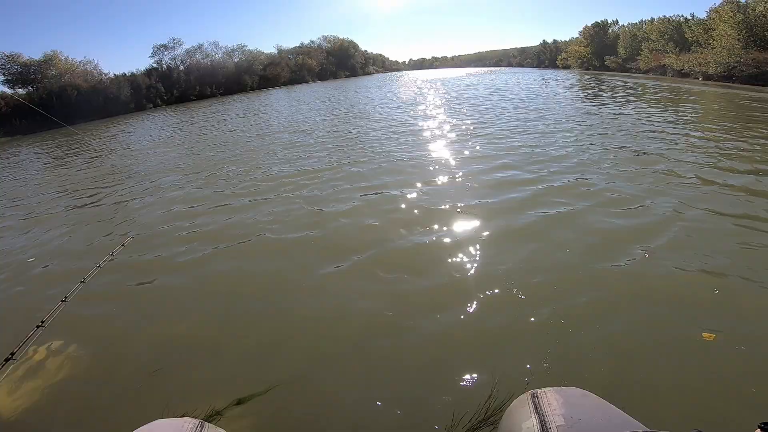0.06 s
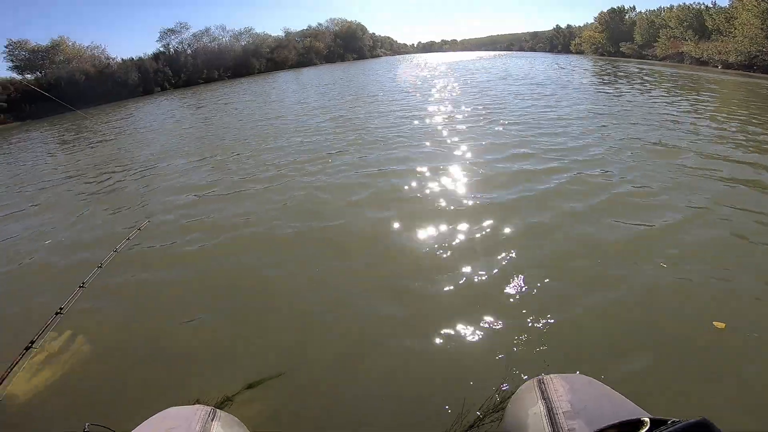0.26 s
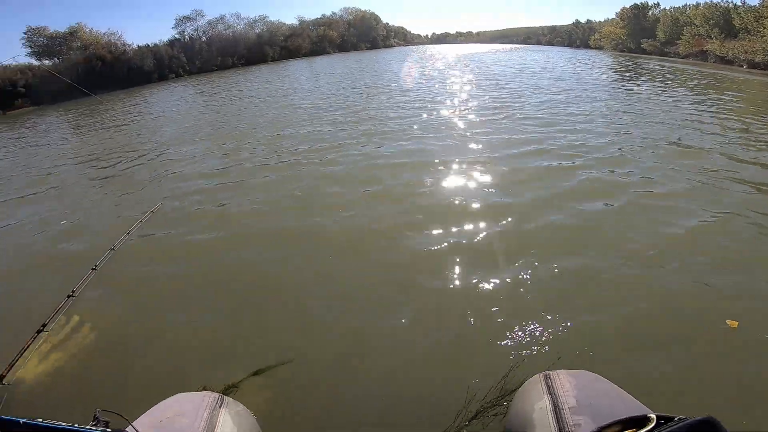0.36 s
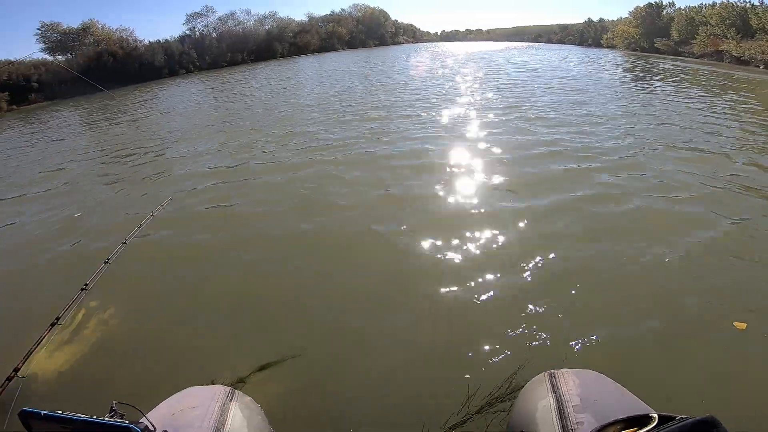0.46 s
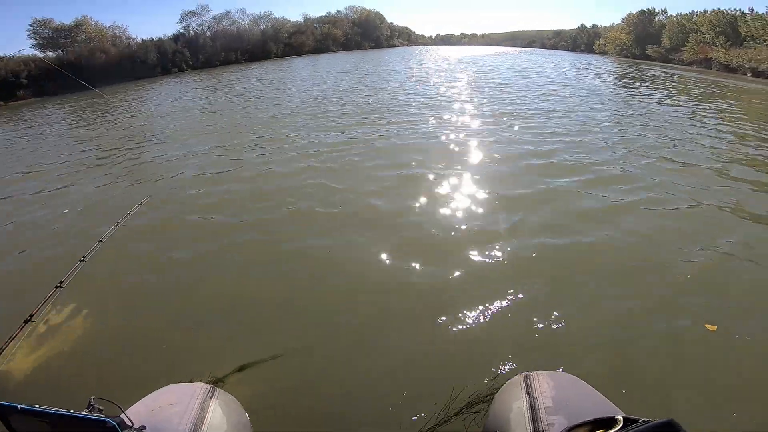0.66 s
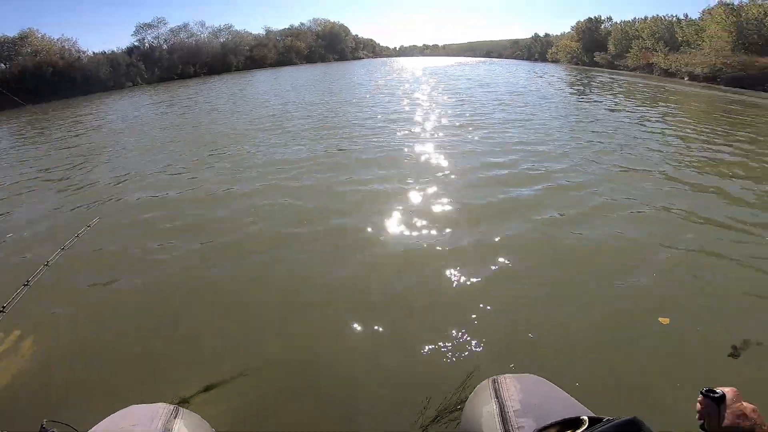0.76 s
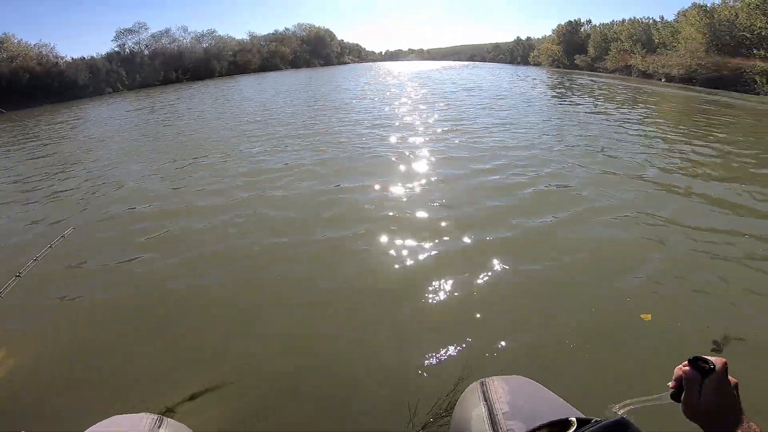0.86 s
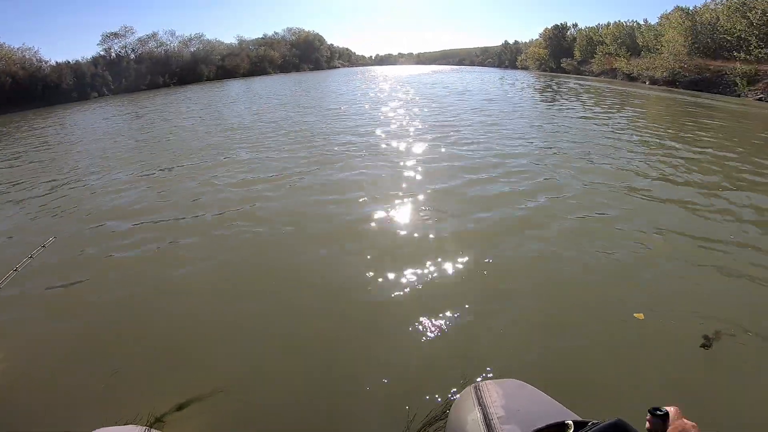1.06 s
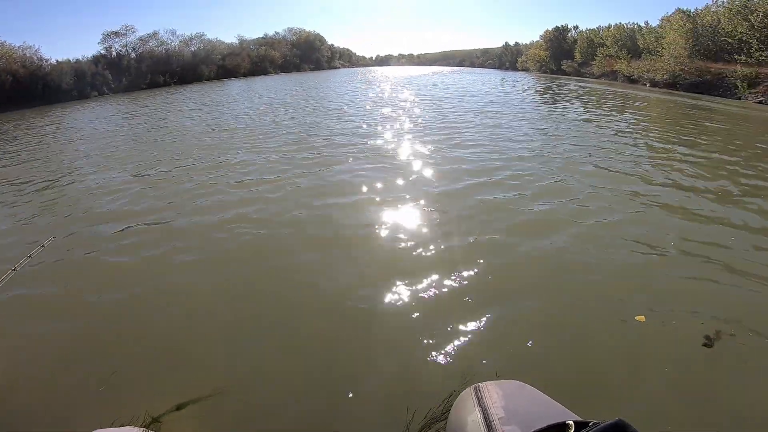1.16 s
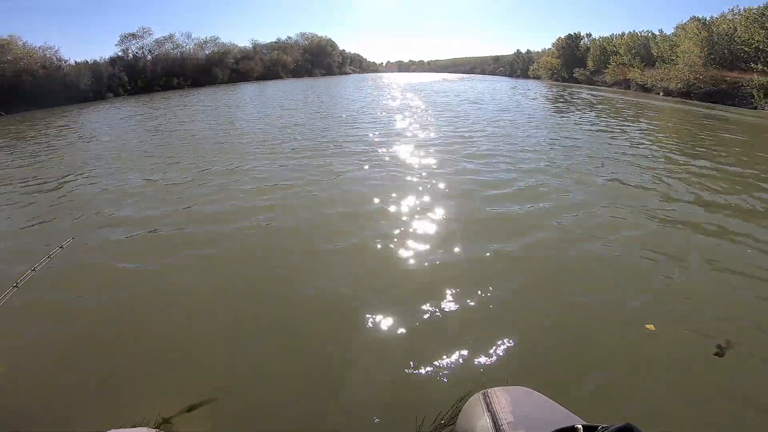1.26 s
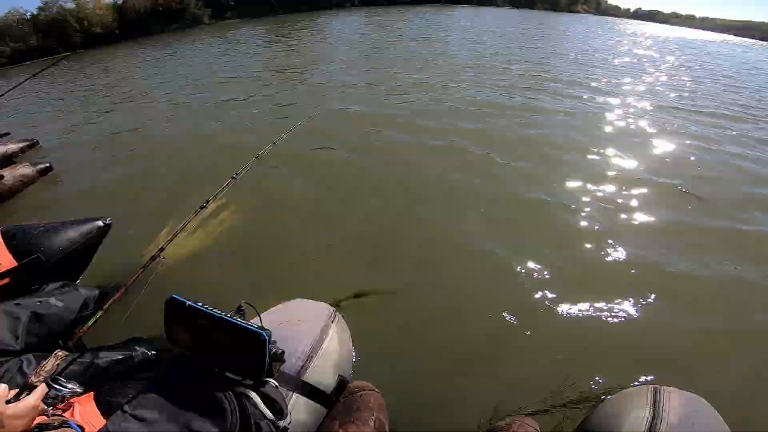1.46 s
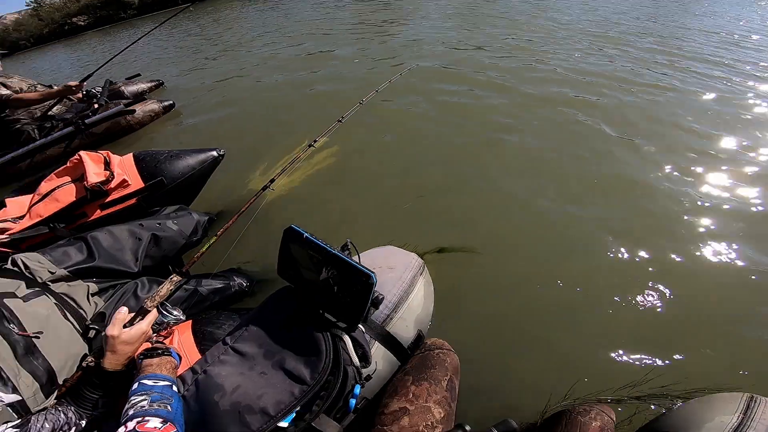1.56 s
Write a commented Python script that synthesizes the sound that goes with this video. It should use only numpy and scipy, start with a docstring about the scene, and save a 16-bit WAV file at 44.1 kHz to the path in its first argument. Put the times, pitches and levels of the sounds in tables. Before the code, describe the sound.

A heavy lure hits a calm river at about 0.2 seconds with a low plop that quickly rises in pitch. Light spray, small bubbles and ticking droplets follow until about 0.7 seconds. A second low plop comes at 1.2 seconds, again trailed by spray and bubbles. Ripples softly glug and lap against a small float over a faint rumble and wash, all close and without echo.

```python
"""Two low plops of a heavy lure in a calm river, heard from a small float.
Each time the surface is slapped, a cavity opens and throbs, then pinches off as a big bubble
whose pitch sweeps up; spray falls back. Small bubbles ring and droplets tick, and ripples
lap at the float over a soft rumble, wash and hiss."""
import sys
import numpy as np
from scipy import signal
from scipy.fft import rfft, irfft
from scipy.io import wavfile

SR = 44100
rng = np.random.default_rng(int(sys.argv[2]) if len(sys.argv) > 2 else 0)


def to_wav(s):
    """Save 16-bit WAV."""
    ch = np.atleast_2d(s).T  # columns
    pcm = np.round(np.clip(ch, -1, 1) * 32767)  # PCM
    wavfile.write(sys.argv[1], SR, pcm.astype(np.int16))


N = 70560
TIME = np.arange(N) / SR


def from_db(db):
    """Decibels to gain."""
    return 10 ** (np.asarray(db) / 20)


def level_curve(points):
    """Gain through (time_s, level_db) points."""
    return from_db(np.interp(TIME, *np.transpose(points)))


def age(start_s):
    """Seconds since an event began, zero before it."""
    return np.maximum(TIME - start_s, 0)


def envelope(start_s, attack_s, t60_s, hold_s=0):
    """Linear rise, hold, exponential release."""
    rise = np.minimum(age(start_s) / attack_s, 1)
    return rise * from_db(-60 * age(start_s + attack_s + hold_s) / t60_s)


def coloured(source, spectrum):
    """Filter by (freq_hz, gain_db) points, falling 12 dB per octave beyond the ends; rms 1."""
    freq_hz, gain_db = np.transpose(spectrum)
    bin_hz = np.maximum(np.arange(N // 2 + 1) * SR / N, 1)
    skirts = np.minimum(bin_hz / freq_hz[0], 1) ** 2 * np.minimum(freq_hz[-1] / bin_hz, 1) ** 2
    gain = from_db(np.interp(np.log(bin_hz), np.log(freq_hz), gain_db))
    out = irfft(rfft(source) * skirts * gain, N)
    return out / out.std()


def noise(spectrum):
    """Coloured Gaussian noise; rms 1."""
    return coloured(rng.standard_normal(N), spectrum)


def patter(spectrum, per_s, spread_db=5.5):
    """Tiny random impacts of uneven size; rms 1."""
    sizes = from_db(spread_db * np.minimum(rng.exponential(1, N), 4)) * rng.choice([-1, 1], N)
    hits = rng.random(N) < per_s / SR
    return coloured(sizes * hits, spectrum)


def tone(start_s, pitch_hz):
    """A pocket of air pulsating at a steady or moving pitch."""
    return np.sin(2 * np.pi * np.cumsum(pitch_hz * (TIME >= start_s)) / SR)


def wobble(depth_db, rate_hz=110.7):
    """Random flutter of a bubble's loudness as its shape changes."""
    return from_db(depth_db * noise([(rate_hz / 2, 0), (rate_hz, 0)]))


# Rumble and gurgle levels: time_s, level_db
RUMBLE_CURVE = [(0, -44.5), (.3, -45), (.55, -47.5), (.68, -56.5), (.85, -47), (1.03, -52.5), (1.17, -39),
                (1.35, -41), (1.5, -41), (1.6, -44)]
GURGLE_CURVE = [(0, -88), (.12, -63.5), (.36, -47), (.52, -58.5), (.65, -66.5), (.85, -71.5), (1.03, -62.5),
                (1.2, -64.5), (1.29, -52.5), (1.45, -70), (1.6, -62)]
# Their spectra: freq_hz, gain_db
RUMBLE_SPECTRUM = [(18, 3), (33, 0), (65, 1), (110, -8), (180, -8.5), (280, -26.5), (400, -35.5),
                   (600, -48)]
GURGLE_SPECTRUM = [(150, 4), (230, 3.5), (320, 5), (400, -11), (520, -22.5)]


def rumble_and_gurgle():
    """Water and air rumble round the float; water gurgles under it."""
    rumble = level_curve(RUMBLE_CURVE) * noise(RUMBLE_SPECTRUM)
    gurgle = level_curve(GURGLE_CURVE) * noise(GURGLE_SPECTRUM)
    return rumble + gurgle


# Hiss level: time_s, level_db
HISS_CURVE = [(0, -77), (.19, -68.5), (.35, -75), (.6, -77.5), (.8, -78), (1.08, -77), (1.14, -70.5),
              (1.19, -62), (1.3, -76.5), (1.42, -73.5), (1.54, -68.5), (1.6, -74)]
# Hiss spectrum: freq_hz, gain_db
HISS_SPECTRUM = [(2500, -5.5), (3600, -10.5), (4600, 4.5), (5200, 1), (6400, -9), (7300, -18), (9000, -17),
                 (11000, -29), (12500, -20), (15500, -23)]


def hiss():
    """Water hisses faintly."""
    return level_curve(HISS_CURVE) * noise(HISS_SPECTRUM)


def trickle(per_s=150, low_hz=560, high_hz=2140, cycles=12, chirp=0.12):
    """A crowd of tiny bubbles, each ringing briefly and rising a little; rms 1."""
    out = np.zeros(N)
    for when, pitch, softness in rng.random((int(per_s * N / SR), 3)):
        onset = int(when * N)
        pitch_hz = low_hz * (high_hz / low_hz) ** pitch
        samples = min(int(cycles / pitch_hz * SR), N - onset)
        life = np.arange(samples) * pitch_hz / (SR * cycles)  # 0 to 1
        ring = np.sin(2 * np.pi * cycles * life * (1 + chirp * life))
        out[onset:onset + samples] += ring * np.sqrt(life) * from_db(-20 * softness - 60 * life)
    return out / out.std()


# Wash level before trim: time_s, level_db
WASH_CURVE = [(0, -78), (.11, -76), (.19, -63.5), (.37, -68), (.45, -69.5), (.6, -71), (.8, -78.5),
              (1.1, -76), (1.18, -65.5), (1.3, -69), (1.42, -63.5), (1.52, -64), (1.6, -65)]
# Wash spectrum: freq_hz, gain_db
WASH_SPECTRUM = [(300, 0), (550, 0.5), (900, 3.5), (1800, 1.5), (2600, -8.5), (3500, -19.5), (6000, -26),
                 (8000, -33)]


def wash(trim_db=-4):
    """Water washes past: equal parts smooth noise and tiny bubbles."""
    return from_db(trim_db) * level_curve(WASH_CURVE) * (noise(WASH_SPECTRUM) + trickle())


# Glugs under the float: start_s, pitch_hz, level_db, attack_s, t60_s
RIPPLE_GLUGS = [(0.071, 125, -34, 0.018, 0.02), (0.336, 248.4, -46, 0.016, 0.12),
                (0.359, 313, -41, 0.0055, 0.077), (0.9638, 266, -38, 0.0042, 0.059),
                (0.964, 149.8, -40, 0.0028, 0.18), (1.105, 176.6, -31, 0.025, 0.026),
                (1.35, 125.7, -30.5, 0.0087, 0.079), (1.494, 34.4, -26.5, 0.014, 0.16),
                (1.59, 189, -34.5, 0.0033, 0.066)]
# Laps on its side: start_s, level_db
RIPPLE_LAPS = [(0.9637, -50), (1.328, -48.5), (1.444, -55), (1.594, -62.5)]
# Lap spectrum: freq_hz, gain_db
LAP_SPECTRUM = [(150, 6.5), (300, -1.5), (700, 7), (1300, -13.5), (2200, -17), (4000, -52.5)]


def ripples(rise_hz_per_s=100):
    """Wavelets trap air under the float and splash on its side."""
    glugs = np.zeros(N)
    for start_s, pitch_hz, level_db, attack_s, t60_s in RIPPLE_GLUGS:
        ring = tone(start_s, pitch_hz + rise_hz_per_s * age(start_s))
        glugs += from_db(level_db) * ring * envelope(start_s, attack_s, t60_s)
    lap_gain = sum(from_db(level_db) * envelope(start_s, attack_s=0.0016, t60_s=0.06)
                   for start_s, level_db in RIPPLE_LAPS)
    return glugs + lap_gain * noise(LAP_SPECTRUM)


# Single drops: start_s, pitch_hz, ring_db, click_db
DROP_TICKS = [(0.0743, 5590, -53.5, -73), (0.457, 5900, -68, -68), (0.482, 4470, -55, -64),
              (.491, 4330, -53, -58.5), (.605, 5700, -65.5, -68), (0.662, 5530, -65, -68),
              (0.965, 4020, -59.5, -73), (1.061, 5560, -60, -71), (1.329, 5750, -63.5, -64.5)]
# Crackle of fine drops: time_s, level_db
CRACKLE_CURVE = [(0.1, -88.5), (.45, -76), (.66, -80.5), (.8, -91), (1.35, -82)]
# Click and crackle spectrum: freq_hz, gain_db
DROP_SPECTRUM = [(3200, -14.5), (4300, -5), (6400, -10), (7300, -23), (11000, -33), (12500, -15),
                 (15000, -29.5)]


def droplets(jitter_rms_hz=350, jitter_rate_hz=330):
    """Fine drops crackle as they fall back; single ones land with a click and a wavering ring."""
    click = noise(DROP_SPECTRUM)
    jitter_hz = jitter_rms_hz * noise([(jitter_rate_hz / 2, 0), (jitter_rate_hz, 0)])
    ticks = np.zeros(N)
    for start_s, pitch_hz, ring_db, click_db in DROP_TICKS:
        ring = from_db(ring_db) * tone(start_s, pitch_hz + jitter_hz)
        ticks += (ring + from_db(click_db) * click) * envelope(start_s, attack_s=0.0016, t60_s=0.017)
    return ticks + level_curve(CRACKLE_CURVE) * patter(DROP_SPECTRUM, per_s=1200)


# Small bubbles: start_s, pitch_hz, rise_hz_per_s, level_db, attack_s, t60_s
SMALL_BUBBLES = [(0.199, 366, 3003.5, -17.5, 0.0049, .018), (0.199, 1595, 5010, -35, 0.0025, 0.018),
                 (0.211, 1068, 3000, -33.5, 0.0014, 0.027), (0.238, 860, 25003, -42.5, 0.003, 0.02),
                 (.268, 1070, -2, -52, .003, 0.037), (0.354, 1290, 9000, -62, 0.009, 0.053),
                 (.481, 670, 33996, -52.5, 0.0041, 0.089), (0.499, 1766, 12091.5, -43.5, 0.0034, 0.0076),
                 (0.507, 1434, 500, -62.5, .004, 0.079), (0.574, 1182, 24586, -65, .012, .05),
                 (0.602, 1093, 17003.5, -60.5, 0.0067, 0.077), (.631, 526.5, 16503.5, -58.5, 0.015, 0.13),
                 (0.693, 1065, 2995.5, -66, .004, 0.057), (1.217, 1214, 4998.5, -35.5, 0.0021, 0.018),
                 (1.2226, 1044, 5000.5, -33.5, .002, 0.0091), (1.2245, 2136, 5000, -40.5, 0.0025, 0.02),
                 (1.259, 1255, 9004.5, -44.5, 0.002, 0.023), (1.33, 843, 5035, -52.5, 0.003, 0.074),
                 (1.33, 1234, 5003, -44.5, 0.00066, 0.022), (1.354, 1143, 5006, -50.5, 0.00353, 0.0185),
                 (1.442, 803, 16000, -48, 0.0057, 0.034), (1.48, 1050, 12000, -56, 0.0045, 0.022)]


def bubbles():
    """Small bubbles, trapped by the slaps or surfacing later, glide upward as they ring."""
    out = np.zeros(N)
    for start_s, pitch_hz, rise_hz_per_s, level_db, attack_s, t60_s in SMALL_BUBBLES:
        ring = tone(start_s, pitch_hz + rise_hz_per_s * age(start_s))
        out += from_db(level_db) * ring * envelope(start_s, attack_s, t60_s)
    return out * wobble(depth_db=2)


# Spray showers: start_s, level_db
SPRAY_SHOWERS = [(0.216, -48.5), (1.224, -49)]
# Spray spectrum: freq_hz, gain_db
SPRAY_SPECTRUM = [(300, -4), (700, -3), (1150, -0.5), (2000, -14), (3400, -26), (4600, -16.5), (6200, -18),
                  (7400, -32.5), (11000, -48), (12500, -23), (15500, -33.5)]


def spray():
    """Spray falls back after each plop in a dying patter."""
    gain = sum(from_db(level_db) * envelope(start_s, attack_s=0.0053, t60_s=0.29)
               for start_s, level_db in SPRAY_SHOWERS)
    return gain * patter(SPRAY_SPECTRUM, per_s=8500)


# Surface slaps: start_s, level_db, attack_s, t60_s, treble_offset_db
SURFACE_SLAPS = [(0.194, -40, 0.0049, 0.039, -1.5), (0.201, -31, 0.003, 0.017, 0),
                 (0.2126, -40, .004, 0.024, 3.5), (1.195, -36.5, 0.0026, 0.038, 8),
                 (1.212, -39, .002, 0.022, 0.5), (1.2221, -35.5, 0.0029, 0.082, -5)]
# Slap spectra: freq_hz, gain_db
SLAP_BODY_SPECTRUM = [(200, -6), (500, 4.5), (1100, 4), (1600, -4.5), (2200, -10), (3500, -41)]
SLAP_TREBLE_SPECTRUM = [(1300, 2), (2400, 3), (3700, -7), (4600, 3.5), (6400, -10), (7400, -28),
                        (11000, -36), (12500, -26), (15500, -29)]


def slaps(treble_db=-8):
    """Water slaps as the lure enters and as the cavity closes."""
    body, treble = noise(SLAP_BODY_SPECTRUM), noise(SLAP_TREBLE_SPECTRUM)
    out = np.zeros(N)
    for start_s, level_db, attack_s, t60_s, treble_offset_db in SURFACE_SLAPS:
        burst = body + from_db(treble_db + treble_offset_db) * treble
        out += from_db(level_db) * burst * envelope(start_s, attack_s, t60_s)
    return out


# Cavity, then big bubble: start_s, cavity_s, cavity_hz, cavity_db,
# bubble_db, first_hz, last_hz, glide_s, attack_s, hold_s, t60_s
LURE_PLOPS = [(0.2008, 0.013, 50.64, -19.5, -2.5, 157.3, 446.3, .029, 0.00298, 0.0095, 0.048),
              (1.199, .0268, 70.7, -10, -4, 155, 359.4, 0.015, 0.0021, 0.001, 0.063)]


def plops(cavity_attack_s=0.00226, cavity_t60_s=0.0082, widen_s=0.005, handover_s=0.00062):
    """A cavity throbs, lower as it widens, then pinches off; the bubble's pitch rises as it surfaces."""
    out = np.zeros(N)
    for (start_s, cavity_s, cavity_hz, cavity_db,
         bubble_db, first_hz, last_hz, glide_s, attack_s, hold_s, t60_s) in LURE_PLOPS:
        pinch_s = start_s + cavity_s
        throb_hz = cavity_hz * (1 + np.exp(-age(start_s) / widen_s))
        bubble_hz = first_hz + (last_hz - first_hz) * np.tanh(age(pinch_s) / glide_s)
        pitch_hz = bubble_hz + (throb_hz - bubble_hz) * np.exp(-age(pinch_s) / handover_s)
        cavity = envelope(start_s, cavity_attack_s, cavity_t60_s, hold_s=cavity_s - cavity_attack_s)
        flutter = wobble(depth_db=2.5 * np.minimum(age(pinch_s) / t60_s, 1))
        bubble = envelope(pinch_s, attack_s, t60_s, hold_s) * flutter
        gain = from_db(cavity_db) * cavity + from_db(bubble_db) * bubble
        out -= gain * tone(start_s, pitch_hz)  # suction: pressure falls first
    return out


def scene():
    """Everything is close by on open water, with no echo; mono."""
    lure = plops() + slaps() + spray() + bubbles() + droplets()
    river = ripples() + rumble_and_gurgle() + wash() + hiss()
    return (lure + river)[None]


def record(dry, cutoff_hz=15750):
    """Steep elliptic low-pass."""
    return signal.sosfilt(signal.ellip(10, .1, 80, cutoff_hz, fs=SR, output="sos"), dry)


dry = scene()
out = record(dry)
to_wav(out)
```